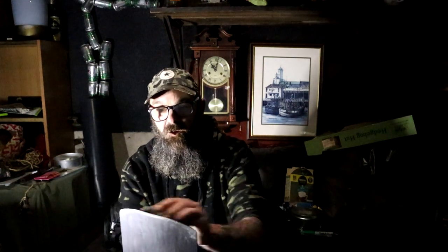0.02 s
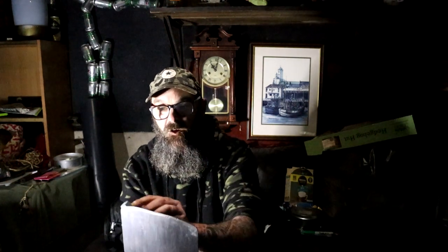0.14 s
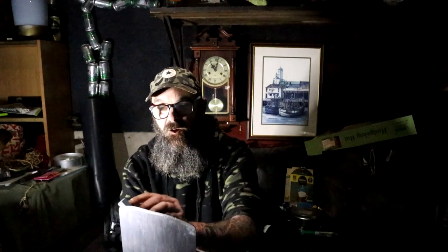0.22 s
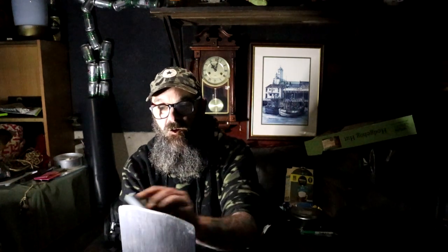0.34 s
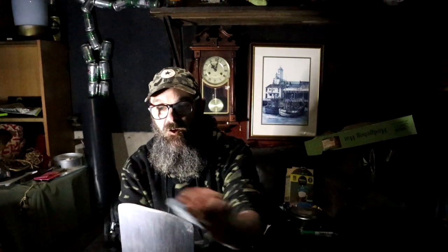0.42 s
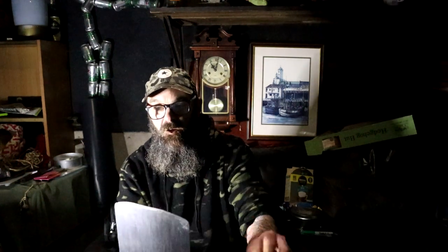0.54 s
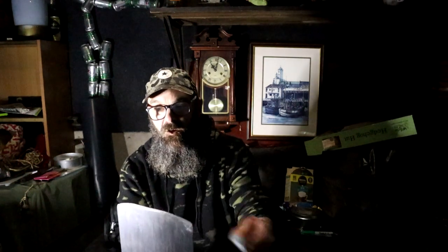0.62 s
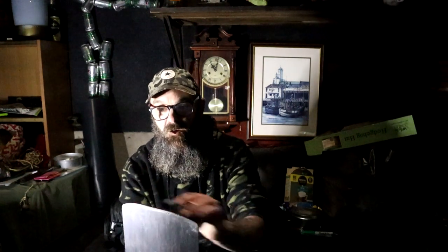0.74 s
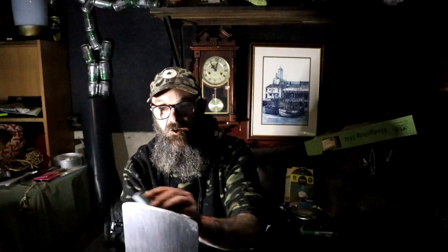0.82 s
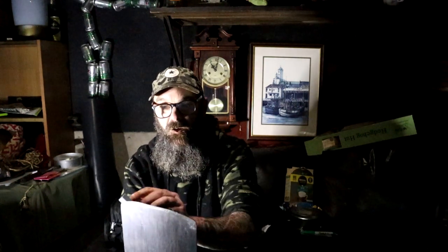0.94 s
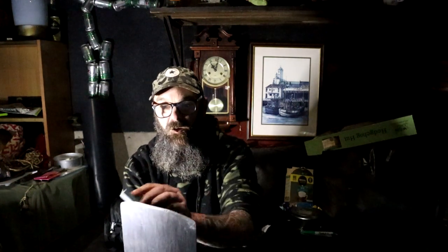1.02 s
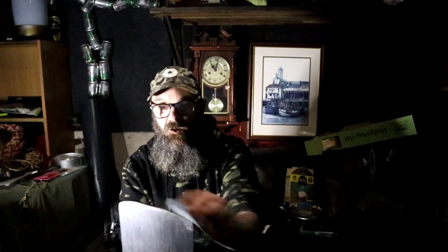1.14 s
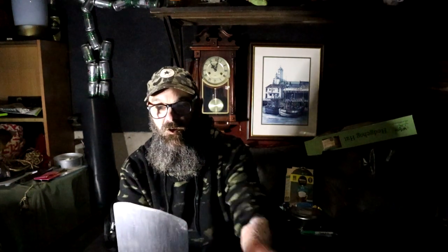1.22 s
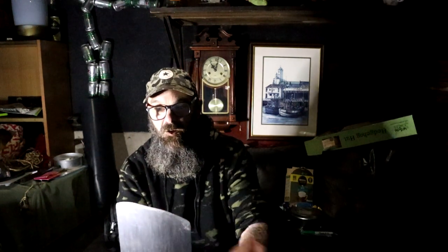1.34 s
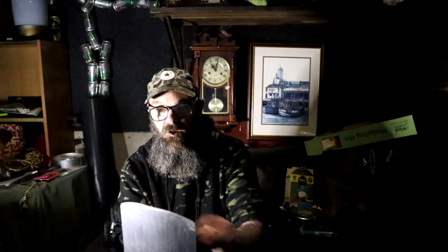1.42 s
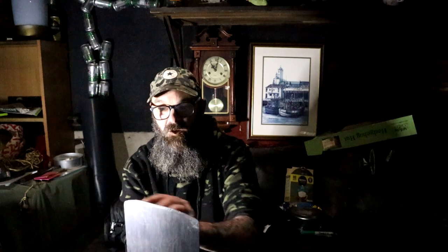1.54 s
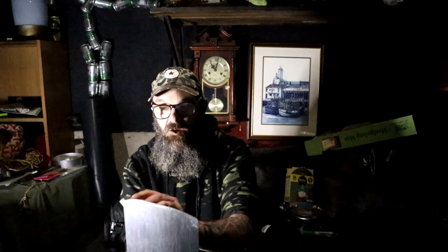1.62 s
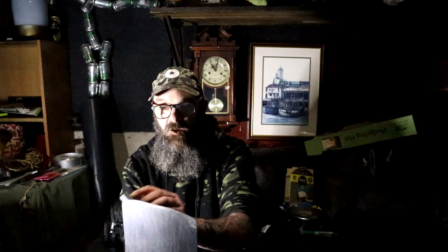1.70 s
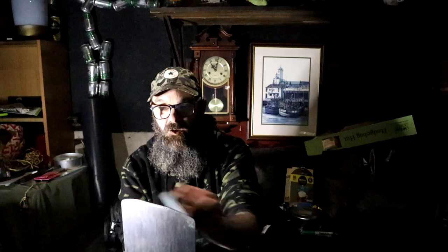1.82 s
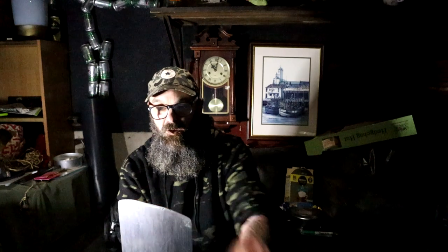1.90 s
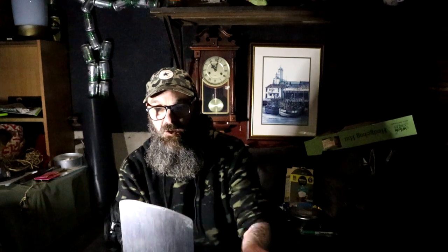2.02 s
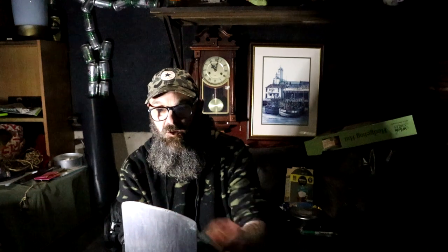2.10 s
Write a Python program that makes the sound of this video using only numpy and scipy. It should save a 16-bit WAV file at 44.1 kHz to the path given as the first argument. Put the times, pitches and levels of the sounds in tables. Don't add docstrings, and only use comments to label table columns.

```python
import sys
import numpy as np
from scipy import signal
from scipy.fft import rfft, irfft
from scipy.io import wavfile
from scipy.ndimage import uniform_filter1d, minimum_filter1d

SR = 44100
rng = np.random.default_rng(int(sys.argv[2]) if len(sys.argv) > 2 else 0)


def put_to_file(sound):
    columns = np.atleast_2d(sound).T
    safe = np.clip(columns, -1, 1)
    whole_steps = np.round(safe * 32767)
    wavfile.write(sys.argv[1], SR, whole_steps.astype(np.int16))


def boost_factor(decibels):
    exponent = np.asarray(decibels, float) / 20
    return 10 ** exponent


N = 97020
T = np.arange(N) / SR


# time in seconds, level in dB, weight on the
# low body in dB, brightness in dB, ring of the held blade in dB.
STROKES = [
    [(.197, -26, -2.5, -1.5, 9), (.262, -34, -17, -4, -5.5), (.29, -36, -11.5, 2, 2),
     (.365, -31.5, 1, 3, -1.5), (.376, -22, -4.5, 0, -4.5), (.39, -15, -4.5, -2.5, -4.5),
     (.45, -16, 6.5, 4, -5), (.508, -18, -10, -0.5, -1.5), (.522, -49, -17, 0.5, -2)],
    [(.98, -31, 2, 3, 15.5), (1.0, -33, -8, 4.5, 4), (1.048, -33, -1.5, 2, 2), (1.058, -37, 2, 5.5, 9.5),
     (1.085, -25, 1, 1, 0), (1.14, -16, 6, -1, -5), (1.185, -17, 5, 5.5, -8.5), (1.234, -15, -10.5, -1, -5),
     (1.25, -46.5, 1, -1, -6.5)],
    [(1.676, -31.5, -1.5, 0, 3), (1.735, -34.5, -11, 0, -3), (1.79, -24, -5, 0, -2.5),
     (1.83, -23.5, -0.5, 5.5, 1), (1.838, -14.5, -1.5, 1.5, -13), (1.88, -16, 7.5, 7, -9),
     (1.93, -16, -7.5, -0.5, -9), (1.95, -49, -6, 1, -2.5)],
]
# start in seconds, peak in dB, length in seconds.
CATCHES = [(.2045, -16.5, 0.0092), (.226, -8.5, 0.0025), (.24, -8.5, 0.011), (.2685, -7, 0.0039),
           (.276, -21, 0.0066), (.305, -13, 0.011), (.319, -14, 0.0082), (.3748, -10, .005),
           (.3875, -1.5, .005), (.4142, -8, 0.0064), (.4227, 6.5, 0.0056), (.456, -3, 0.005),
           (.49, 1.5, 0.013), (1.0667, -16, .006), (1.072, -15, 0.0064), (1.0886, -15.5, 0.0047),
           (1.14, -5, 0.0047), (1.164, 2.5, 0.0085), (1.189, -4, 0.0043), (1.208, -2.5, .008),
           (1.683, -17, 0.0068), (1.696, -14.5, 0.0063), (1.708, -16.5, .004), (1.719, -16, .005),
           (1.734, -15, .004), (1.749, -12.5, 0.011), (1.7751, -15.5, 0.0059), (1.798, -5, 0.015),
           (1.8355, -6.5, 0.006), (1.85, 11.5, 0.0025), (1.868, -0.5, .008), (1.9, 2, 0.0027),
           (1.912, -3, .005), (1.926, -3.5, .005)]
# pitch in Hz, level in dB, time to fade 60 dB in seconds.
HELD_RING = [(1135, -25, .12), (1430, -18, .07), (2210, -11, .03), (2990, 0, .032), (3740, -6, .045),
             (3880, -9, .04), (4625, -9, .035), (4930, -12, .03), (5445, -14, .05), (5990, -18, .04),
             (7220, -11, .06), (8760, -19, .04), (10170, -22, .06)]
# pitch in Hz, level in dB, time to fade 60 dB in seconds.
BELLY = [(927, -8, .05), (1230, 0, .05), (1440, -2, .06), (1720, -3, .04)]
# pitch in Hz, level in dB, time to fade 60 dB in seconds.
HANDLE_THUD = [(275, -5, .025), (400, -6, .02), (545, 0, .03), (620, -2, .03), (850, -6, .02)]
THUD_LOW_HZ = 198


def rasp():
    travel_s, split_hz, bright_from_hz = .16, 1600, 3400
    rows = np.vstack(STROKES)
    level, weight, bright, held = (np.interp(T, rows[:, 0], column) for column in rows[:, 1:].T)
    on = sum((T >= s[0][0] - .002) & (T < s[-1][0]) for s in STROKES)
    grit = (rng.random(N) < 6000 / SR) * rng.standard_normal(N)
    drag = unit(grit) * on * boost_factor(level + 1.3 * walk(90) + 1)
    force = drag + puffs(CATCHES) * boost_factor(-10.5)

    out = conv(force * boost_factor(held - 7), struck(HELD_RING))
    out = out + conv(force * boost_factor(weight - 15.5), struck(BELLY))
    edges_hz = 400 * 2 ** np.linspace(0, 5.5, 8)
    for k in range(4):
        here = np.sqrt(2) * np.cos(np.pi * (T / travel_s + k / 4))
        blade = sheet(.028) + boost_factor(-20) * sheet(.09, count=90)
        for j, (low, high) in enumerate(zip(edges_hz[:-1], edges_hz[1:])):
            lean = weight * np.clip(np.log2(2 * split_hz / low) / 2, 0, 1)
            shine = bright * max(np.log2(low / bright_from_hz), 0)
            db = 1.2 * walk(30) + lean + shine
            patch = conv(force * here * boost_factor(db - 7.0), band(blade, low, high))
            out = out + (-1) ** j * patch
    handle = conv(force, struck(HANDLE_THUD[:1]))
    return above(out, 507) + boost_factor(-42) * above(handle, THUD_LOW_HZ)


# start in seconds, peak in dB, settling time in seconds.
LANDINGS = [
    (0.195, -13, 0.004),
    (0.9724, 5, 0.0025),
    (1.6697, -6, 0.002),
]


def landings():
    events = np.array(LANDINGS) - [.0008, 0, 0]
    force = puffs(events) * boost_factor(-7)
    force[(events[:, 0] * SR).astype(int)] += boost_factor(events[:, 1] + 14)
    blade = struck(HELD_RING) + boost_factor(-7.5) * sheet(0.023)
    soft_start = 1 - np.exp(-T[:len(blade)] / .0004)
    rap = above(conv(force, blade * soft_start), 590)
    thud = conv(force, struck(HANDLE_THUD, longest=0.017))
    return rap + boost_factor(-31) * above(thud, THUD_LOW_HZ)


# pitch in Hz, level in dB, time to fade 60 dB in seconds.
OLD_RING = [(1230, -56, 3.5), (1368, -51.5, 1.5), (2525, -46, .4)]
# pitch in Hz, time to fade 60 dB in seconds.
FREE_RING = [(619, .28), (958, .33), (1168, 1.7), (1367, 1.2), (1447, .3), (1610, .36), (2260, .12),
             (2525, .66), (3714, .26), (3835, .12), (4045, .19), (6002, .1), (8177, .09), (10860, .13)]
# level in dB after stroke 1, 2 and 3.
FREE_RING_DB = [(-39, -38, -39), (-50.5, -42.5, -35), (-40.5, -48.5, -44.5), (-39, -40.5, -47.5),
                (-26.5, -27.5, -26.5), (-47, -30.5, -33.5), (-33, -26, -20.5), (-29, -27.5, -26.5),
                (-17.5, -19, -18), (-20, -27, -25), (-27.5, -19.5, -18), (-22.5, -27, -30),
                (-31, -27, -20.5), (-30.5, -34, -29)]
LIFT_S = [.514, 1.24, 1.932]
TOUCH_S = [0.77, 1.47, 2.096]
# start in seconds, pitch in Hz, level in dB, time to fade 60 dB in seconds.
EDGE_RING = [(.514, 2050, -39.5, 0.21), (.514, 3074, -34.5, .2), (.514, 4760, -40.5, .11),
             (.514, 8780, -32.5, .07), (1.24, 2044, -40, 0.27), (1.24, 4950, -34.5, 0.065),
             (1.24, 6514, -34, 0.069), (1.24, 7020, -31.5, 0.095), (1.24, 10050, -44, 0.21),
             (1.24, 10400, -28, 0.083), (1.24, 11500, -43, 0.091), (1.932, 2070, -38, .2),
             (1.932, 3015, -44.5, .2), (1.932, 4630, -35, .09), (1.932, 4930, -27.5, 0.054),
             (1.932, 5685, -28, 0.087), (1.932, 8460, -35.5, 0.16), (1.932, 12900, -42, 0.11)]


def song():
    swell_s, touch_damp_db_s, touch_above_hz = .012, 98.5, 2000
    out = sum(boost_factor(db - 60 * T / t60) * np.sin(2 * np.pi * hz * T) for hz, db, t60 in OLD_RING)
    for k, (lift, touch) in enumerate(zip(LIFT_S, TOUCH_S)):
        after, swell = np.maximum(T - lift, 0), np.exp(np.minimum(T - lift, 0) / swell_s)
        for (hz, t60), db in zip(FREE_RING, FREE_RING_DB):
            damping = touch_damp_db_s * np.maximum(T - touch, 0) * (hz > touch_above_hz)
            loudness = boost_factor(db[k] - 60 * after / t60 - damping) * swell
            out = out + loudness * np.sin(2 * np.pi * (hz * T + rng.random()))
    for lift, hz, db, t60 in EDGE_RING:
        after, swell = np.maximum(T - lift, 0), np.exp(np.minimum(T - lift, 0) / swell_s)
        out = out + boost_factor(db - 60 * after / t60) * swell * np.sin(2 * np.pi * hz * T)
    return out


# start in seconds, peak in dB, handle thud in dB.
TICKS = [(0.0024, -41, -5), (0.0105, -43, -7.5), (0.0201, -35, -3), (0.0355, -33, -7), (0.0493, -31, -6),
         (0.0644, -34, -2.5), (0.1003, -35.5, -3.5), (0.1257, -34.5, -4), (0.726, -48, -8.5),
         (0.741, -51, -2), (0.7469, -42.5, -3), (0.7679, -40.5, 2.5), (0.7802, -36, -5.5),
         (0.8004, -32.5, -5), (0.8361, -33.5, -4.5), (0.933, -43, -5.5), (1.47, -41, -27),
         (1.4839, -42, -6), (1.496, -41.5, -1), (1.5109, -39, -1), (1.527, -33.5, -6.5), (1.5687, -37, -8),
         (1.6399, -43.5, -5.5), (2.1234, -51.5, -12), (2.1351, -42.5, -16), (2.151, -39, -10),
         (2.1685, -45, -7), (2.1796, -40, -2), (2.1964, -42, -12.5)]
# pitch in Hz, level in dB, time to fade 60 dB in seconds.
TICK_RING = [(1350, -12, .02), (2200, -9, .018), (2600, -6, .02), (3020, -1, .021), (3714, -21, .2),
             (2525, -24, .2), (3500, -8, .02), (4030, -3, .02), (4450, -10, .016), (4900, -10, .016),
             (5650, -22, .045), (7800, -22, .02)]


def ticks():
    start, peak, thud_db = np.array(TICKS).T
    same = np.ones(len(start))
    tap = np.zeros(N)
    tap[(start * SR).astype(int)] = boost_factor(peak + 19)
    rattle = puffs(np.c_[start, peak - 12.5, .0056 * same])

    blade = struck(TICK_RING, phase=rng.random(len(TICK_RING)))
    blade = blade + boost_factor(-6) * band(sheet(0.014), 1000, 5470)
    blade = blade + boost_factor(-9.5) * band(sheet(0.034), 7100, 11440)
    soft_start = 1 - np.exp(-T[:len(blade)] / .0015)
    tick = conv(tap + rattle, blade * soft_start)
    push = puffs(np.c_[start + .003, peak + thud_db - 2.5, .002 * same])
    return boost_factor(7.0) * above(tick + conv(push, struck(HANDLE_THUD)), THUD_LOW_HZ)


# frequency in Hz, level in dB.
HUSH = [(12, -20), (20, 10), (79, 4), (182, 1), (1030, -1.5), (1600, -1.5), (2200, -12), (4300, -15),
        (16000, -24.5)]


def hush():
    hz = np.maximum(np.fft.rfftfreq(N, 1 / SR), 10)
    noise = irfft(rfft(rng.standard_normal(N)) * colour(HUSH, hz), N)
    return unit(noise) * boost_factor(-56 + 0.2 * walk(15.0))


# frequency in Hz, level in dB.
BODY = [(400, -43), (800, -26), (1400, -9.5), (3700, 1), (5200, 0), (8000, -3), (11000, -11),
        (16000, -30.5)]


def sheet(t60, count=320):
    place = (np.arange(count) + rng.random(count)) / count
    level_luck, decay_luck = rng.standard_normal((2, count))
    hz = 400 + 15600 * place ** 1.4
    notch = -11 * np.exp(-((hz - 6490) / 770) ** 2)
    db = 20 * np.log10(colour(BODY, hz)) + 2 * level_luck + notch
    return struck(np.c_[hz, db, t60 * boost_factor(1.5 * decay_luck)], phase=rng.random(count))


def struck(table, phase=0, longest=0.36):
    modes, t = np.array(table), T[:6000, None]
    fade = boost_factor(modes[:, 1] - 60 * t / np.clip(modes[:, 2], .005, longest))
    h = np.sum(fade * np.sin(2 * np.pi * (modes[:, 0] * t + phase)), axis=1)
    return h / np.sqrt(np.sum(h ** 2))


def puffs(rows):
    r = np.array(rows)
    after = T - r[:, :1]
    fade = np.exp(-np.abs(after) / np.clip(r[:, 2:], 3e-4, .03))
    bursts = boost_factor(r[:, 1:2]) * (after >= 0) * fade
    return bursts.sum(axis=0) * np.sign(rng.standard_normal(N))


def walk(rate):
    k = int(SR / rate)
    steps = np.repeat(rng.standard_normal(N // k + 1), k)
    return unit(uniform_filter1d(steps, k)[:N])


def unit(x):
    return x / np.sqrt(np.mean(x ** 2))


def colour(points, hz):
    p = np.array(points)
    return boost_factor(np.interp(np.log(hz), np.log(p[:, 0]), p[:, 1]))


def conv(x, h):
    return signal.fftconvolve(x, h)[:N]


def band(x, lo_hz, hi_hz):
    return signal.sosfilt(signal.butter(2, [lo_hz, hi_hz], "bandpass", fs=SR, output="sos"), x)


def above(x, hz):
    return signal.sosfilt(signal.butter(4, hz, "highpass", fs=SR, output="sos"), x)


def scene():
    near = rasp() + landings() + ticks()
    t = T[:SR // 2]
    tail = band(rng.standard_normal(len(t)), 370, 5000) * boost_factor(-60 * t / 0.13) * (t > .003)
    echoes = boost_factor(-16.5) * conv(near, tail / np.sqrt(np.sum(tail ** 2)))
    return (near + song() + echoes + hush())[None]


def band_limit(x):
    return signal.sosfilt(signal.butter(12, 16320, fs=SR, output="sos"), x)


def record(dry):
    ceiling, limit_samples = .93, 90
    x = signal.sosfilt(signal.ellip(8, .2, 70, 16000, fs=SR, output="sos"), dry)
    room_left = minimum_filter1d(ceiling / np.maximum(np.abs(x), ceiling), size=2 * limit_samples + 1)
    return band_limit(x * uniform_filter1d(room_left, size=limit_samples))


dry = scene()
out = record(dry)
put_to_file(out)
```